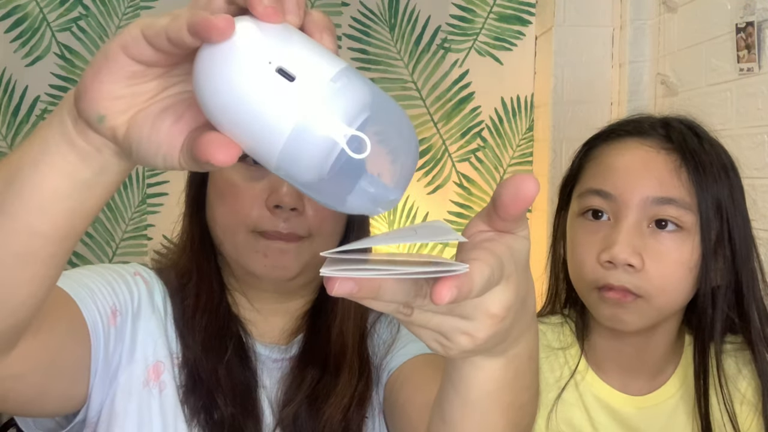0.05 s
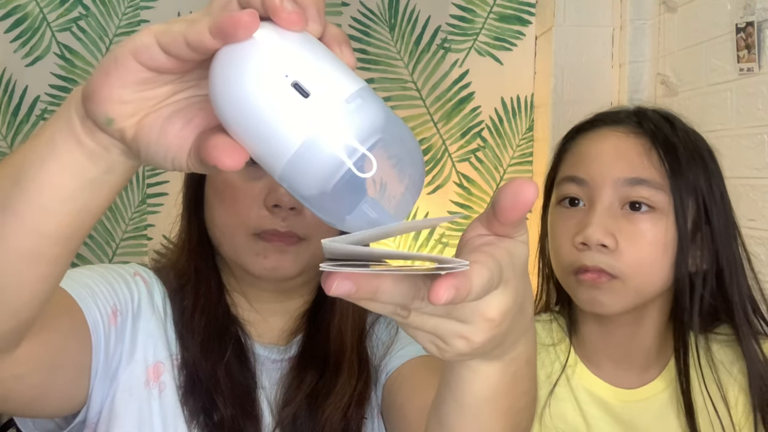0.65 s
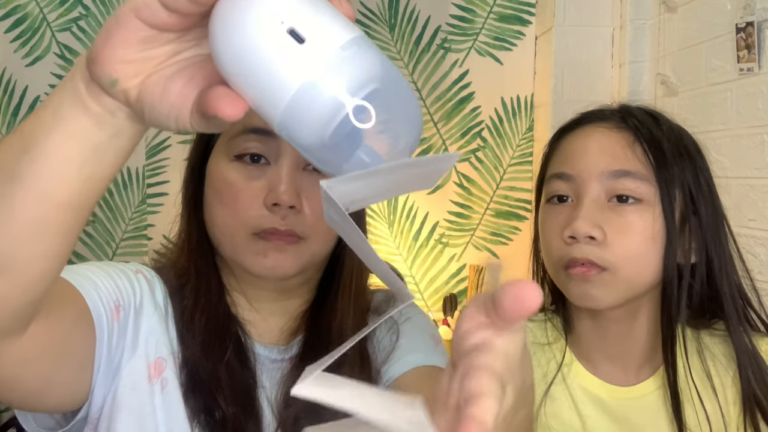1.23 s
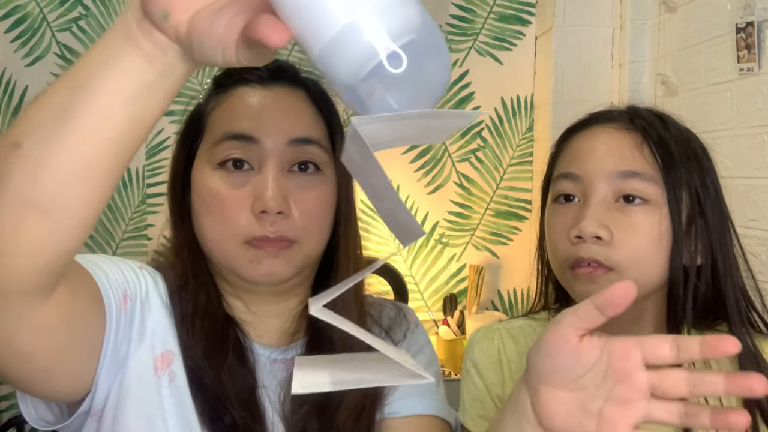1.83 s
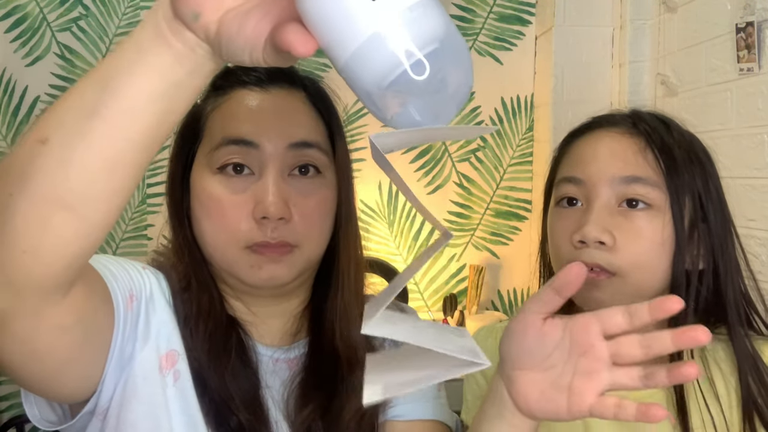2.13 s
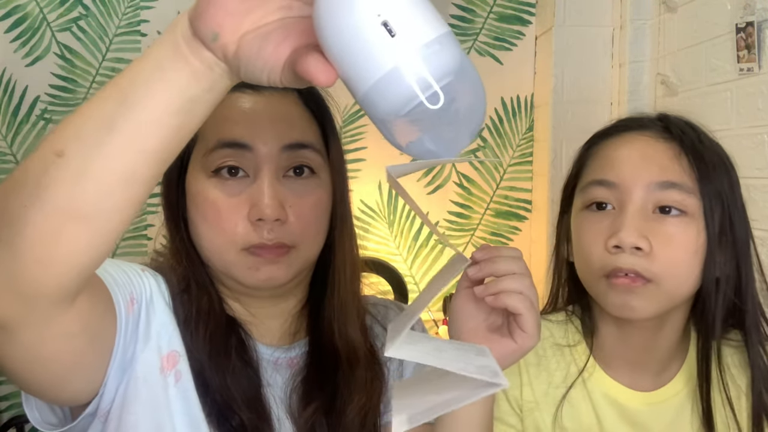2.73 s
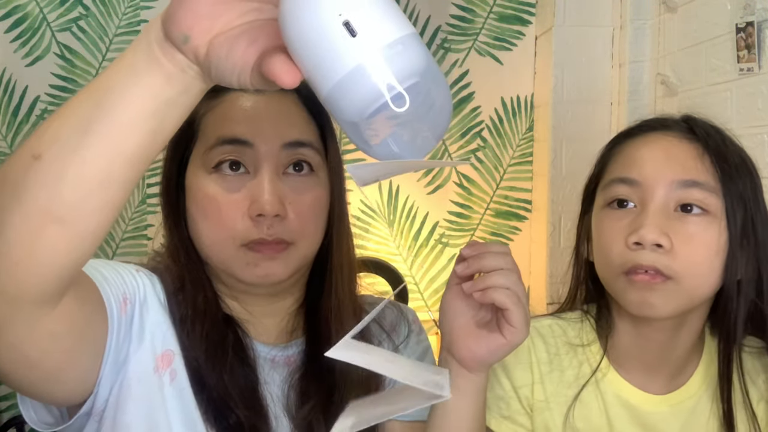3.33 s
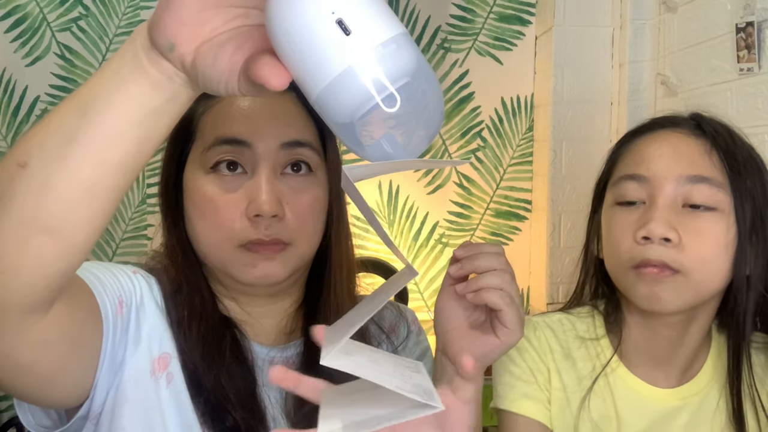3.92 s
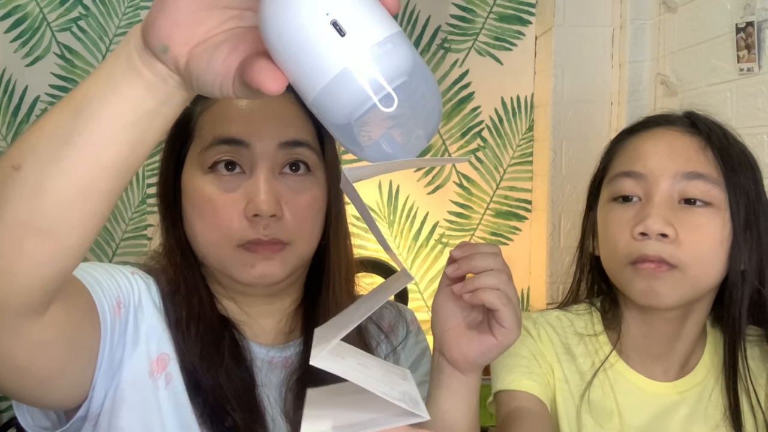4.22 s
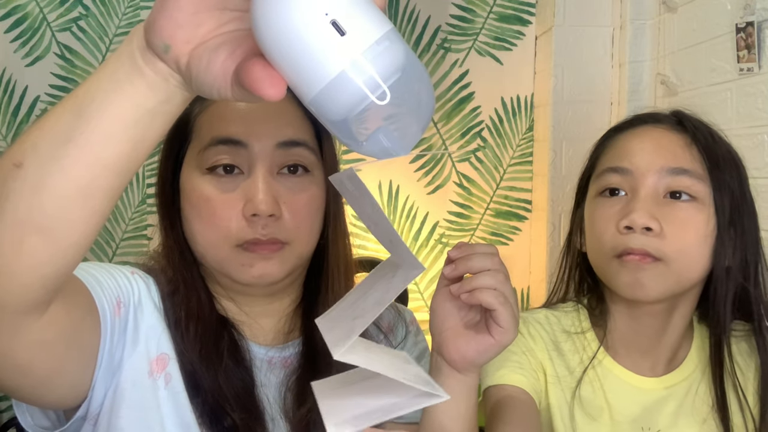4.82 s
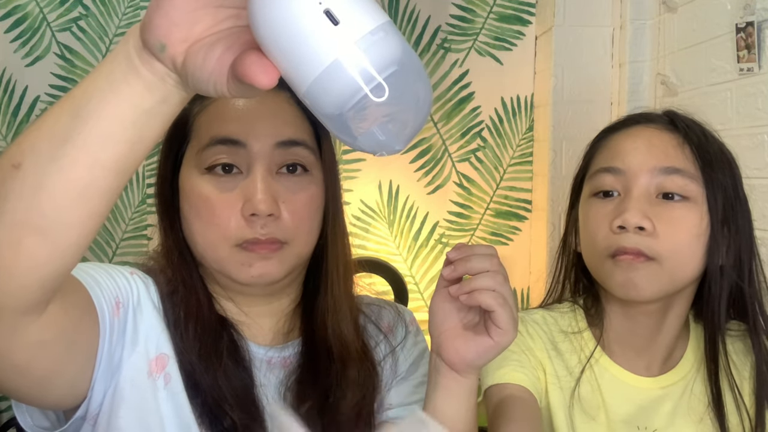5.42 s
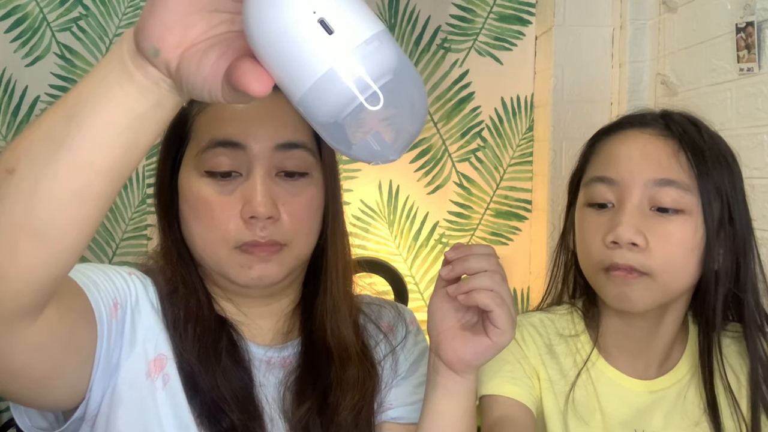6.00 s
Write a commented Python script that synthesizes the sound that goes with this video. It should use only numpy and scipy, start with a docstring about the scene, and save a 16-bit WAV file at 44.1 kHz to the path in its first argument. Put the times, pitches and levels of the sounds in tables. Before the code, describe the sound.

A small handheld vacuum is heard close to the microphone in a living room with a faint low hum and rumble. A button clicks right at the start, followed by a thin electronic chirp and another click. From about 0.3 seconds the motor rattles and whines upward, reaching full speed at around 1.2 seconds. It holds a steady high whine over rushing air, with a piercing whistle that swells and fades. Around 1.5 to 2 seconds air hisses faintly past a paper strip at the nozzle. At about 4.7 seconds the button clicks again, the whistle drops away and the whine falls steadily in pitch. The paper flutters softly just after 5 seconds and lands with a light, crackling slap at about 5.8 seconds. The motor is still winding down at the end, around 6 seconds.

```python
"""A living room, with a small handheld vacuum close to the two microphone ports of a phone.
A button clicks; the brushless motor chirps, rattles up to speed and whines on the multiples of its
shaft rate, over rushing air and the impeller's whistle. The nozzle lifts a folded paper strip and air
hisses past its edge. A second press lets the rotor coast down; the paper flutters off and lands.
Behind it all are a low hum, a dull rumble and a short tail from the walls."""
import sys
import numpy as np
from scipy import signal
from scipy.fft import rfft, irfft
from scipy.io import wavfile

SR = 44100
rng = np.random.default_rng(int(sys.argv[2]) if len(sys.argv) > 2 else 0)


def bounce(signal):
    """Save signal as a 16-bit WAV file at the path given by the first command-line argument."""
    frames = np.transpose(np.atleast_2d(signal))
    limited = np.clip(frames, -1, 1)
    pcm = np.round(limited * 32767).astype(np.int16)
    wavfile.write(sys.argv[1], SR, pcm)


N = 267113
TIME = np.arange(N) / SR
FREQ = np.fft.rfftfreq(N, 1 / SR)
SIDES = np.array([[1], [-1]])  # left port, right port
POWER_S, OFF_S = .25, 4.75
TOP_HZ = 15750  # upper limit of the microphone

# Full speed, a little higher while the paper chokes the nozzle: (time [s], shaft rate [Hz])
FULL_SPEED = [(1.25, 346.3), (1.7, 346.2), (2.35, 342.2), (3.7, 340.6), (4.7, 342.7)]
# Friction and air slow the unpowered rotor: (time [s], shaft rate [Hz])
COAST_SPEED = [(4.745, 342.7), (4.8, 333.9), (5.09, 292.4), (5.38, 247.6), (5.65, 215.4), (6.06, 177.2)]


def shaft(nudge_s=.16, nudge_hz_per_s=590, nudge_top_hz=89.66, spin_up_s=.339):
    """The driver drags the rotor round, full power takes over, and once switched off it coasts."""
    full, = curves(FULL_SPEED)
    nudge = np.clip(nudge_hz_per_s * (TIME - nudge_s), 0, nudge_top_hz) / full
    driven = np.maximum(nudge, np.tanh((TIME - POWER_S) / spin_up_s))
    share = np.where(TIME < OFF_S, driven, curves(COAST_SPEED)[0] / full)
    octave = np.log2(np.maximum(share, 1e-3))  # 0 at full speed, negative below
    effort = (1 - driven ** 2) * ramp(POWER_S)
    coasting = ramp(OFF_S)
    return full * share, octave, effort, coasting


# The motor's lines: (shaft multiple, relative level [dB])
MOTOR_LINES = [(1, -29.0), (2, -44.0), (3, -30.3), (4, -27.3), (5, -13.5), (6, -20), (7, -20.5), (8, -20.5),
               (9, -21.5), (10, -16.0), (11, -23.5), (12, -15.5), (13, -22.5), (14, -28.0), (15, -22.5),
               (16, -20.5), (17, -20.5), (18, -28.0), (19, -19.5), (21, -16.0), (22, -29.0), (23, -31.5),
               (24, -20.5), (25, -9.0), (26, -16.0), (27, -22.5), (28, -31.5), (29, -29.5), (30, -16.5),
               (31, -25.0), (32, -29.5), (33, -24.0), (34, -28.5), (35, -28.0), (36, -26.0), (37, -48.5),
               (38, -45.5), (39, -25.5), (40, -18.5), (41, -36.5), (42, -28.5), (43, -33.0), (44, -31.5),
               (45, -18.0)]
# What the plastic shell lets through: (frequency [Hz], gain [dB])
SHELL_GAIN = [(200, -7.0), (350, 0.0), (700, 2.5), (1000, 2.5), (1250, 0.0), (1500, -2.5), (1900, -10.5),
              (2400, -2.5), (2700, -6.0), (2870, -6.0), (3100, -10.0), (3750, -17.0), (4500, -19.0),
              (5750, -23.0), (6500, -23.5), (7750, -12.5), (9300, -15.5), (11000, -18.5), (15500, -22.0)]
# Lines with their own answer to load: (shaft multiple, gain at full effort [dB], gain coasting [dB])
LINE_LOAD = [(1, -8.5, -0.5), (3, -4, -2), (4, -12, -3), (5, 4.5, -11), (6, -7, -4), (7, -2.5, -3),
             (8, -30.0, -1), (9, 13, -3), (10, -1, -3), (11, 0, -5), (12, 2, -4.5), (13, 0, -7), (15, 9, 0),
             (25, -26.0, -11.5), (26, -38.0, -6.0), (30, -7.5, -0.5), (35, 6.5, 8.0), (40, -25.5, -3.0),
             (45, -10.0, -7.5)]
# A line swells or sinks as it crosses a resonance or its path to the microphone changes:
# (shaft multiple, time [s], half length [s], gain [dB])
LINE_SWELLS = [(3, 2.2, .13, 5.5), (3, 2.95, .25, -3.5), (3, 3.85, .15, 3), (3, 4.65, .08, 6),
               (3, 5.97, .17, -9), (5, .67, .07, 4), (5, 1.13, .06, 4), (5, 1.4, .12, -4), (5, 1.7, .06, 6),
               (5, 1.86, .03, -6), (5, 2.65, .1, 3), (5, 2.88, .07, -4), (5, 3.07, .06, 3),
               (5, 5.7, .08, 5), (5, 6.02, .06, 7), (6, .87, .1, -7), (6, 1.15, .1, 6), (6, 1.53, .03, 11),
               (6, 1.63, .02, 7), (6, 1.71, .04, -9), (6, 2.05, .2, 5), (6, 4.9, .08, -6), (6, 6, .15, 4),
               (7, 1.55, .06, -5), (8, 1.15, .15, 4), (8, 1.9, .04, -7), (8, 2.35, .05, 4),
               (8, 2.55, .14, -4), (8, 2.88, .07, 4), (8, 3.06, .05, -8), (8, 3.8, .07, -4),
               (9, .39, .08, 8), (9, .57, .04, 5), (9, 1.2, .2, 5), (9, 2.35, .05, -8), (9, 3.65, .35, 7),
               (9, 3.98, .04, -9), (9, 4.35, .2, -7), (9, 4.68, .07, 5), (9, 5.36, .06, 5),
               (10, .655, .035, 7), (10, .73, .03, -5), (10, .82, .03, 3), (10, .93, .05, -7),
               (10, 1.08, .06, 5), (10, 1.48, .08, -9), (10, 2.5, .14, -8), (10, 5.13, .07, 7),
               (12, .65, .05, 6), (12, 1, .2, 3), (15, .32, .04, 8), (15, 5.63, .15, -7), (13, 1.3, .3, 6),
               (16, 1.8, .25, 10), (30, 2.4, .4, 6), (30, 4.35, .12, -10), (35, 5.42, .07, 8),
               (35, 5.6, .15, 3), (40, 1.02, .08, 9), (40, 3.85, .3, 5), (40, 5.05, .1, 4)]
# The nozzle dips towards the microphone: (time [s], dip [1 = fully dipped])
NOZZLE_DIP = [(0.7, 0.28), (1.05, 0.48), (1.2, 0.59), (1.55, 0.87), (2, 0.49), (2.35, -0.04), (3.5, -0.07),
              (4.7, 0.1)]
# Change at full dip: (shaft multiple, gain [dB], left minus right [dB], left lead [rad])
DIPPED_LINES = [(3, 11.5, 13, -3), (4, 0, -3, -.4), (5, -16, -8, -2.4), (6, -6, 2.5, -1.5),
                (7, -1, 5, 1.35), (8, -9, -3, .4), (9, 3, -3, 2.1), (10, -8, -2, -3), (12, -9, -3.5, -1),
                (15, 6, 0, 0), (25, -6, 0, 0), (30, 4, 0, 0), (40, 5, 0, 0)]


def motor(speed, angle, octave, effort, coasting, level_db=-18.3, straining_db=-7.5, coasting_db=-1):
    """Close up, shaft multiples glide through the shell's resonances, less steady on a slow rotor."""
    dip, = curves(NOZZLE_DIP)
    dipped = {round(k): change for k, *change in DIPPED_LINES}
    loaded = {round(k): change for k, *change in LINE_LOAD}
    loose = 8 * np.clip(1 - speed / speed.max(), 0, .25)
    angle = angle + (.005 + .018 * loose) * walk(70)
    out = np.zeros((2, N))
    for k, db in MOTOR_LINES:
        unbalance, blade = k == 1, k > 10 and k % 5 == 0
        db_per_octave = 39 if unbalance else 10 if blade else 16
        strain_db, free_db = loaded.get(k, (0, 0))
        load_db = (straining_db + strain_db) * effort + (coasting_db + free_db) * coasting
        # small moves of the hand change each line's path to the microphone
        unrest_db = 1.2 * walk(3) + 2.4 * loose * walk(18) + 1.2 * walk(25)
        swell_db = sum(size * np.exp(-((TIME - s) / length) ** 2)
                       for line, s, length, size in LINE_SWELLS if line == k)
        shell_db = at(SHELL_GAIN, k * speed)
        level = level_db + db + db_per_octave * octave + load_db + shell_db + unrest_db + swell_db
        phase = k * angle + rng.uniform(0, 2 * np.pi)
        if k in dipped:
            change_db, lean_db, lead = dipped[k]
            level = level + dip * (change_db + SIDES * lean_db / 2)
            phase = phase + dip * SIDES * lead / 2
        out = out + undb(level) * np.sin(phase)
    return np.sqrt(2) * out * ramp(POWER_S)


# The whistle beams past the microphone as the hand moves:
# (time [s], level [dB], left lead [rad], left minus right [dB])
WHISTLE_BEAM = [(.3, -90, 4.6, 0), (.58, -56, 4.7, 0), (.64, -47, 5, 4), (.76, -45.5, 4.3, 8),
                (.88, -37, 4, 0), (.95, -36, 4.2, -1), (1, -28, 4, 0), (1.16, -25, 4.3, 1),
                (1.3, -29, 4.4, 4), (1.48, -31, 4.6, -6), (1.55, -37, 4.2, -13), (1.66, -35, 5, -12),
                (1.8, -43, 4.5, -6), (1.9, -36.5, 3.6, 0), (2.05, -33, 3.7, 7), (2.24, -32, 5, 12),
                (2.5, -31, 4.3, -2), (2.6, -35, 4.5, -1), (2.75, -32.5, 3.9, -1), (2.83, -38.5, 3.8, 2),
                (2.95, -39, 2.3, 9), (3.04, -47, 2.5, 0), (3.25, -35, 2.4, 0), (3.42, -31, 2.9, 0),
                (3.7, -31.5, 2.8, -2), (4.04, -30, 3.3, 2), (4.18, -37.5, 3, 5), (4.3, -34.5, 2.6, -1),
                (4.76, -42, 2.5, -1), (4.82, -46, 5, 1), (5, -50, 5.2, 1), (5.14, -46, 5.2, 0),
                (5.4, -61, 4.3, 0), (6.05, -61, 4.3, 0)]


def whistle(angle, octave, multiple=20):
    """The impeller's tone meets the ports out of step and unequally loud, rougher below full speed."""
    db, lead, lean_db = curves(WHISTLE_BEAM)
    loose = np.clip(-8 * octave, 0, 1)
    level = db + (1 + 1.5 * loose) * walk(60) - 1.5 * loose
    lean = undb(SIDES * lean_db / 2)
    lean = lean / np.sqrt(np.mean(lean ** 2, axis=0))
    phase = multiple * angle + (.1 + .6 * loose) * walk(150) + SIDES * lead / 2
    return np.sqrt(2) * undb(level) * lean * np.sin(phase)


# Air through filter and vents: (frequency [Hz], relative density [dB])
AIR_SPECTRUM = [(100, -10.5), (250, -10), (440, 1), (660, -5.5), (830, -4), (1500, -15.5), (2200, -12.5),
                (2950, -6), (3400, -11), (3900, -6), (5000, -10.5), (6200, -10), (7500, -7), (9500, -7.5),
                (11500, -8), (13000, -17.5), (15500, -15)]


def air(angle, octave, effort, level_db=-43.5, db_per_octave=9.5, effort_db=10, gust_db=.5):
    """Turbulent air rushes through the vacuum, chopped a little once a turn."""
    flow_db = level_db + db_per_octave * octave + effort_db * effort
    rush = noise() * (1 + .086 * np.cos(angle)) * undb(gust_db * walk(25))
    return unit(shaped(rush, undb(at(AIR_SPECTRUM, FREQ)))) * undb(flow_db)


def rattle(speed, angle, octave, effort, coasting, start_db=-24.5, coast_db=-53.5, width_octaves=.7):
    """The rotor shakes rough shaft multiples out of the shell: a rattle starting, a whirr coasting."""
    gain = undb(start_db + 10.5 * octave) * effort ** 2 + undb(coast_db) * coasting
    centre_hz = 1740 * 2 ** (.18 * octave)
    cluster, power = 0, 1e-3
    for k in range(3, 32):
        octaves_off = np.log2((k * speed + 1) / centre_hz)
        weight = np.exp(-.5 * (octaves_off / width_octaves) ** 2) * undb(4.5 * walk(12))
        cluster = cluster + weight * np.sin(k * angle + .4 * walk(200) + rng.uniform(0, 2 * np.pi))
        power = power + weight ** 2 / 2
    grit = undb(3 * effort * walk(300))
    return gain * grit * cluster / np.sqrt(power)


def high_comb(speed, angle, scatter_db=3):
    """As the rotor slows, a faint comb of still higher shaft multiples sinks into hearing."""
    comb = 0
    for k in range(MOTOR_LINES[-1][0] + 1, 85):
        audible = np.clip((TOP_HZ - k * speed) / 1000, 0, 1)
        gain = audible * undb(scatter_db * walk(2))
        comb = comb + gain * np.sin(k * angle + rng.uniform(0, 2 * np.pi))
    return undb(-70) * comb * (speed / 200) ** 2


# The driver chops the coil current to start the rotor: (time [s], level [dB], split [0-1])
CHIRP_SHAPE = [(.085, -73, 0.1), (.11, -69, 0.1), (.154, -54, 0), (.162, -43, .2), (.22, -47, 1),
               (.26, -52, .8), (.3, -51, 1), (.38, -50, 1), (.42, -60, 1)]
# The coils' tones: (multiple of the chopping rate, relative level [dB])
CHIRP_TONES = [(1, 3), (2, -5), (3, -22), (4, -18), (5, -25)]


def coil_chirp(angle, chop_hz=1974, end_s=.41, split_per_turn=3.3):
    """The coils sing at the chopping rate; once the field turns, the lowest tone splits in two."""
    db, split = curves(CHIRP_SHAPE)
    turning = 1 - split + np.sqrt(2) * split * np.cos(split_per_turn * angle)
    out = 0
    for k, tone_db in CHIRP_TONES:
        gain = undb(tone_db + 4 * walk(50)) * (turning if k == 1 else 1)
        out = out + gain * np.sin(2 * np.pi * k * chop_hz * TIME + .45 * walk(400))
    return np.sqrt(2) * undb(db) * out * (1 - ramp(end_s))


# The button is pressed and let go: (time [s], relative level [dB], gain of modes above 5 kHz [dB])
BUTTON_SNAPS = [(0.0633, -35, -20), (0.0663, -33.5, -30), (0.2741, -33, -14), (4.742, -33, -25),
                (4.749, -38, -18), (4.9373, -42.5, -7)]
# Modes of the plastic: (frequency [Hz], width [Hz], gain [dB])
BUTTON_MODES = [(537, 52, 8.5), (1300, 910, 2), (2680, 710, 7.5), (3890, 280, 14), (5900, 5400, 15.5),
                (7450, 360, 31.5), (12000, 4000, -48.5)]


def button(decay_s=.0014, tail_db=-14, tail_s=.018):
    """Each snap of the switch rings the plastic and dies away inside the shell."""
    dull, bright = np.zeros(N), np.zeros(N)
    for s, db, bright_db in BUTTON_SNAPS:
        age = np.maximum(TIME - s, 0)
        envelope = np.exp(-age / decay_s) + undb(tail_db) * np.exp(-age / tail_s)
        snap = undb(db) * (TIME >= s) * envelope * noise()
        dull += snap
        bright += snap * undb(bright_db)
    return 2 * sum(undb(db) * shaped(bright if hz > 5000 else dull, resonance(hz, width))
                   for hz, width, db in BUTTON_MODES)


# The paper closes the nozzle: (time [s], hiss level at full speed [dB])
GAP_HISS = [(.9, -60), (1.45, -55), (1.62, -49), (1.85, -53), (2.1, -62), (4.7, -85)]


def gap_hiss(octave, hz=5000, width_hz=1700, db_per_octave=24):
    """The narrow gap between nozzle and paper hisses while the impeller draws air."""
    db, = curves(GAP_HISS)
    level = db + db_per_octave * octave + 2 * walk(15)
    return undb(level) * unit(shaped(noise(), resonance(hz, width_hz) ** 2))


# The strip flutters off and lands nearby: (time [s], level [dB], rise [s], decay [s], centre [Hz])
PAPER_FLAPS = [(5.125, -37.5, .025, .045, 650), (5.28, -49, .015, .03, 1100),
               (5.739, -31.5, .005, .02, 3500), (5.7605, -22, .001, .011, 3100),
               (5.769, -31, .003, .026, 2200), (5.766, -39, .003, .03, 550), (5.819, -42, .003, .015, 4000)]


def paper(crackle_db=.5, grain_samples=32):
    """The folded strip flaps and slaps in short swells of crackling noise."""
    out = 0
    for s, db, rise, decay, hz in PAPER_FLAPS:
        swell = np.exp(np.minimum((TIME - s) / rise, (s - TIME) / decay))
        rustle = noise()
        grains = np.repeat(rng.standard_normal(N // grain_samples + 1), grain_samples)[:N]
        band = resonance(hz, .47 * hz) * resonance(hz, 3 * hz)
        out = out + undb(db) * swell * unit(shaped(rustle * undb(-crackle_db * grains), band))
    return out


# The room's hum: (frequency [Hz], level [dB])
HUM_LINES = [(70, -56), (103.5, -53), (138.5, -60.5), (207.5, -65.5), (274.5, -67)]
# Its slow swell: (time [s], gain [dB])
HUM_SWELL = [(0, -2.5), (1.65, -10), (1.8, 0.5), (3, 1.5), (3.8, 3.5), (4.4, -1.5), (4.8, -1.5), (6.05, -4)]


def hum(waver_db=3, wander_rad=.45):
    """A low hum stands in the room, each line wavering in level and phase."""
    swell_db, = curves(HUM_SWELL)
    out = 0
    for hz, db in HUM_LINES:
        gain = undb(db + swell_db + waver_db * walk(11))
        out = out + gain * np.sin(2 * np.pi * hz * TIME + wander_rad * walk(10))
    return np.sqrt(2) * out


# Room tone: (frequency [Hz], relative density [dB])
ROOM_SPECTRUM = [(20, -44), (33, -34), (50, -31), (80, 2), (120, -0.5), (180, -12), (300, -27),
                 (1000, -18.5), (4000, -27), (15000, -87)]


def rumble(room_db=-52, deep_db=-48, fade_db_per_s=5.5):
    """Dull room tone swells with the hum; a deeper rumble beneath it fades steadily."""
    swell_db, = curves(HUM_SWELL)
    floor = unit(shaped(noise(), undb(at(ROOM_SPECTRUM, FREQ))))
    deep = unit(shaped(noise(), resonance(hz=51.8, width_hz=31) ** 3))
    return undb(room_db + .79 * swell_db) * floor + undb(deep_db - fade_db_per_s * TIME) * deep


def walls(x, t60_s=.35, dull_hz=7000):
    """The walls return a short, dull tail, different at each port."""
    decay = undb(-60 * TIME / t60_s) * (TIME > .004)
    tails = [noise() * decay for _ in range(2)]
    lowpass = 1 / (1 + 1j * FREQ / dull_hz) ** 2
    return np.array([shaped(x, lowpass * rfft(tail / np.linalg.norm(tail))) for tail in tails])


# Phase between the microphone ports: (frequency [Hz], left lead [rad])
PORT_PHASE = [(100, 0), (400, -.2), (690, 1.8), (850, .8), (1020, 2.1), (1360, .5), (1710, 1.5),
              (2050, 2.6), (2390, 2.2), (2740, 1.6), (3420, 1.1), (3800, 2.3), (4400, 1.8), (5800, .9),
              (6850, 2.35), (7700, 3.1), (9000, 3.1), (10250, 1.7), (11500, .2), (13200, -.4),
              (15700, -2.7)]
# Balance between them: (frequency [Hz], left minus right [dB])
PORT_BALANCE = [(100, -2), (340, 2), (700, 2), (1030, 1), (1700, 2), (2050, -1.5), (2400, 0), (2740, 5),
                (3070, 0), (3420, 3), (4200, .5), (16000, 0)]


def ports(x):
    """The two microphone ports hear a near source with different phase and level."""
    left = np.exp(.5j * at(PORT_PHASE, FREQ)) * undb(at(PORT_BALANCE, FREQ) / 2)
    return shaped(x, np.array([left, 1 / left]))


def undb(db):
    """Decibels to gain."""
    return 10 ** (np.asarray(db) / 20)


def curves(table):
    """The columns of a time table at every sample."""
    s, *columns = np.transpose(table)
    return [np.interp(TIME, s, c) for c in columns]


def at(table, hz):
    """A spectrum table read on a log-frequency axis."""
    f, value = np.transpose(table)
    return np.interp(np.log(np.maximum(hz, 1)), np.log(f), value)


def unit(x):
    """Scale to rms 1."""
    return x / np.std(x)


def shaped(x, gain):
    """Filter by a gain for every frequency."""
    return irfft(rfft(x) * gain, N)


def resonance(hz, width_hz):
    """Response of one damped mode."""
    return 1 / (1 + 1j * (FREQ ** 2 - hz ** 2) / (np.maximum(FREQ, 1) * width_hz))


def noise():
    """White noise."""
    return rng.standard_normal(N)


def walk(rate):
    """A random curve with a spread near 1, through rate new values a second."""
    return 1.2 * np.interp(TIME * rate, np.arange(4096), rng.standard_normal(4096))


def ramp(start_s, length_s=.01):
    """A short rise from 0 to 1."""
    return np.clip((TIME - start_s) / length_s, 0, 1)


def scene(waver_hz=.2, tone_echo_db=-11.5, whistle_echo_db=-21, noise_echo_db=-7.5):
    """The vacuum and the paper close to the microphone, the living room around them."""
    speed, octave, effort, coasting = shaft()
    angle = 2 * np.pi * np.cumsum(speed + waver_hz * walk(7)) / SR  # the shaft wavers under load
    tones = motor(speed, angle, octave, effort, coasting) + high_comb(speed, angle) + coil_chirp(angle)
    noises = rattle(speed, angle, octave, effort, coasting) + air(angle, octave, effort)
    noises = noises + gap_hiss(octave) + button() + paper()
    beam = whistle(angle, octave)
    echo = walls(undb(tone_echo_db) * tones.mean(axis=0) + undb(whistle_echo_db) * beam[0]
                 + undb(noise_echo_db) * noises)
    direct = ports(tones + noises + hum() + rumble()) + beam
    side_rumble = SIDES * undb(-10) * rumble()  # the part that differs between the ports
    return direct + echo + side_rumble


def record(dry):
    """The phone cuts the top with a steep low-pass."""
    return signal.sosfilt(signal.ellip(10, .2, 80, TOP_HZ, fs=SR, output="sos"), dry)


dry = scene()
out = record(dry)
bounce(out)
```